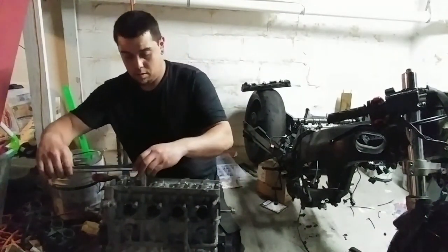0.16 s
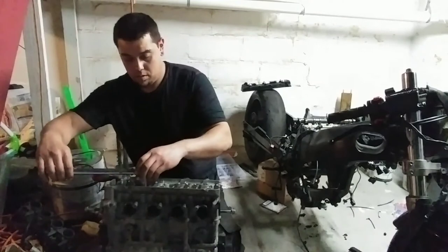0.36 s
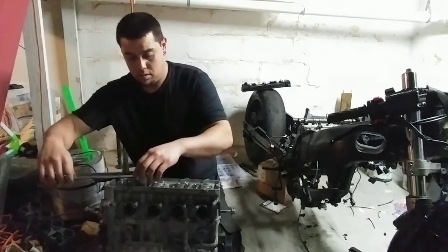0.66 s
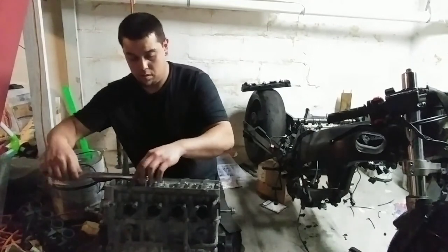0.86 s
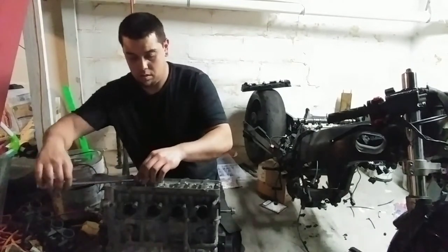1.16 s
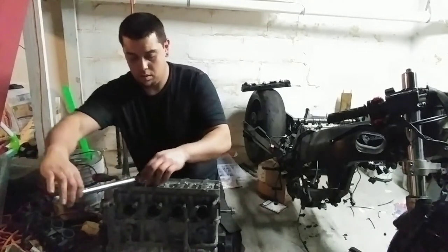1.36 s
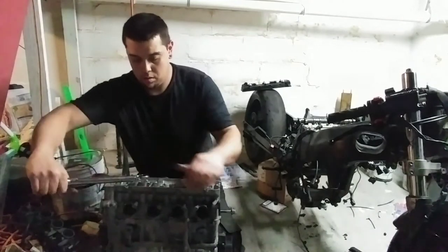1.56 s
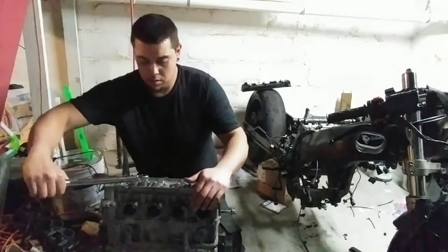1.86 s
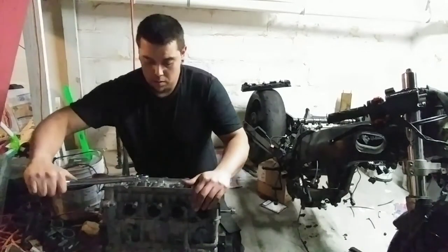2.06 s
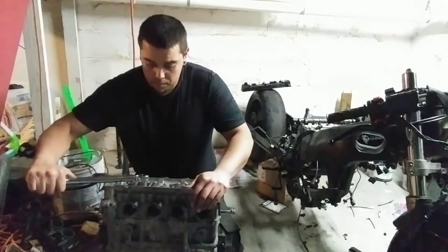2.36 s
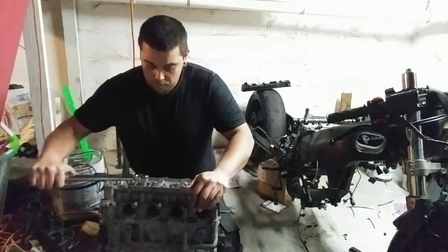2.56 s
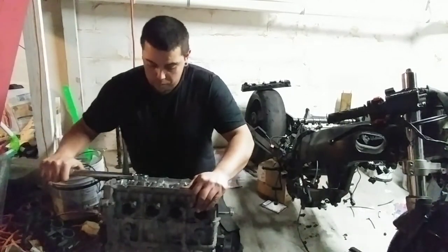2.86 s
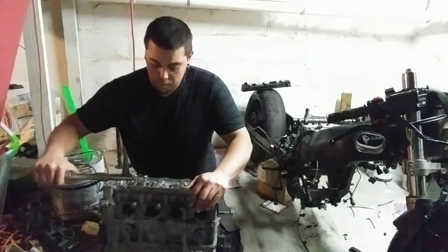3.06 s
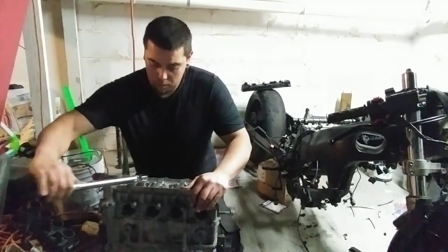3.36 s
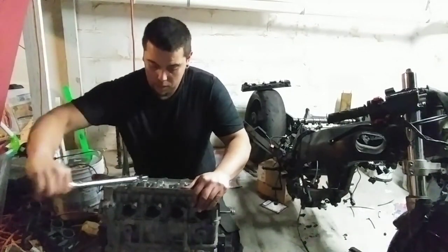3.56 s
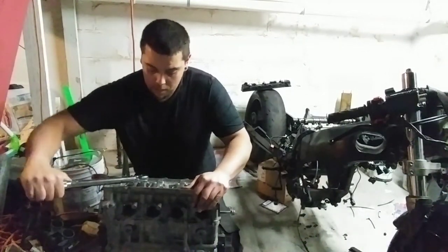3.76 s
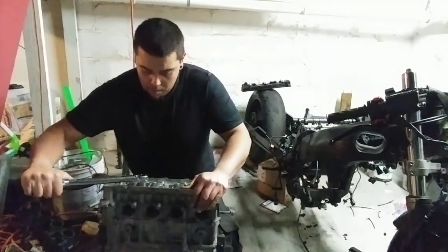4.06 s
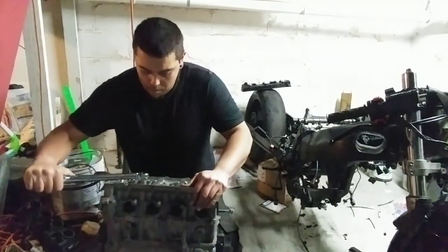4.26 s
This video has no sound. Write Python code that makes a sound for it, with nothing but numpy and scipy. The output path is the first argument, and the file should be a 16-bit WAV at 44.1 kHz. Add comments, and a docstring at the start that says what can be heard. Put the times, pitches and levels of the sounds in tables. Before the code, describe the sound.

Steady low hum, rumble and faint hiss fill a small garage while a wrench works on an engine bolt. Two small socket ticks lead into a single sharp steel click with a brief high ring, by far the loudest sound. A quick run of five ratchet ticks follows, then a faint tick and brief thin hiss. Later the ratchet ticks four times and the grip scuffs lightly. The microphone makes the clicks sound bright and crisp.

```python
"""A click-type torque wrench tightens an engine bolt in a small garage, over hum, rumble and hiss.
The socket ticks twice as it takes the load. At 0.8 s the toggle slips and hammers the steel tube:
one loud ringing click. On the back swing the pawl skips five ratchet teeth. A second pull at 1.6 s
brings a faint socket tick and a soft swell of hiss. From 3.3 s the pawl skips four more teeth,
then the handle scuffs in the grip. Throughout, the microphone adds a peak near 7 kHz."""
import sys
import numpy as np
from scipy import signal
from scipy.fft import rfft, irfft
from scipy.io import wavfile
from scipy.ndimage import uniform_filter1d

SR = 44100
rng = np.random.default_rng(int(sys.argv[2]) if len(sys.argv) > 2 else 0)


def to_wav(s):
    """Save 16-bit WAV."""
    ch = np.atleast_2d(s).T  # columns
    pcm = np.round(np.clip(ch, -1, 1) * 32767)  # PCM
    wavfile.write(sys.argv[1], SR, pcm.astype(np.int16))


N = 193599
BLOW_T_S = np.arange(SR // 2) / SR
SCENE_T_S = np.arange(N) / SR

# break-over crack: freq_hz, density_db
CRACK_SPECTRUM = [(400, -34), (850, -24), (1600, -17), (2100, -18), (2580, -8.5), (2950, -12.5),
                  (4100, -14), (4700, -7), (5500, -15), (7200, 0.5), (8100, -9), (8700, -12.5),
                  (10200, -19.5), (15500, -27)]
# ring of tube, socket and bolt, as heard: pitch_hz, level_db, t60_s
STEEL_MODES = [(2577, -18, .2), (2615, -16, .22), (2671, -18, .2), (3090, -16, .21), (4586, -15, .24),
               (4700, -14, .26), (4985, -13, .2), (6261, -13, .26), (6551, -11, .28), (6645, -3, .2),
               (6963, -2, .32), (7038, 0, .26), (7160, -3, .27), (7346, -1, .24), (7456, -3, .21),
               (7945, -7, .22), (8145, -6, .2), (8416, -13, .24), (8961, -14, .22), (9582, -20, .18),
               (12540, -20, .13)]
# pawl drops off a tooth: start_s, level_db, hardness_db, socket_ring_db
PAWL_DROPS = [(1.1792, -29.5, 1, -8.5), (1.2220, -28.5, -4, -3), (1.2642, -27, -0.5, -5.5),
              (1.3078, -28, -0.5, -22), (1.3580, -31, -2, -10), (3.3230, -29, -6, -22),
              (3.368, -28, -1, -17), (3.415, -27, 4, -17), (3.4719, -28, 5, -18)]
# pawl tick resonances as heard, including the microphone's 7 kHz peak: pitch_hz, width_hz, level_db
PAWL_TICK_PEAKS = [(1740, 170, -14), (2780, 560, -15), (4500, 640, -15), (5750, 420, -3.5), (6890, 340, 4),
                   (7460, 550, -0.5), (7900, 250, -7.5), (10000, 410, -9.5), (10830, 390, -8),
                   (12550, 560, -4.5), (14050, 600, -13), (15150, 560, -14)]
# socket shifts on the bolt: start_s, level_db, treble_db, decay_s
SOCKET_SHIFTS = [(0.3927, -49.5, 19, 0.0018), (0.5155, -31, -3, 0.0016), (1.6046, -47, 9, 0.0046)]
# socket tick: freq_hz, density_db
SOCKET_SPECTRUM = [(600, -29), (1800, -12.5), (3000, -13), (3800, -2.5), (4520, 1.5), (5250, 0), (6100, -6),
                   (7200, 0.5), (8150, -5), (8800, -16), (15500, -31)]
# handle scuffs in the grip: start_s, level_db, treble_db, decay_s
GRIP_SCUFFS = [(3.6532, -48.5, -21, 0.0054), (3.6861, -45, 5, 0.011), (3.7050, -46.5, 1, .006)]
# grip scuff: freq_hz, density_db
GRIP_SPECTRUM = [(600, -16), (1500, 2), (2800, 2), (3700, -1), (4500, 2), (5300, -7), (7200, 4),
                 (8800, -14), (15500, -18)]
# garage reverberation: freq_hz, t60_s
ROOM_DECAY = [(500, 0.28), (2100, 0.33), (5500, 0.31), (7200, 0.29), (10000, 0.21), (15000, 0.15)]
# swelling hiss: freq_hz, density_db
SWELL_SPECTRUM = [(2000, -12), (5500, -11), (7200, 0.5), (8800, -21), (15500, -30)]
# mains and distant motor: pitch_hz, rms_db
HUM_LINES = [(119.4, -42.5), (241.5, -47.5), (361, -51), (398, -55.5), (518, -55.5), (638, -51),
             (1039, -55)]
# room rumble: freq_hz, density_db
RUMBLE_SPECTRUM = [(20, -32), (33, -18), (45, -17), (57, 4), (76, -3), (98, 4), (135, -5.5), (250, -6.5),
                   (300, -9), (430, -10.5), (800, -16), (1060, -15), (1400, -23.5), (1700, -50)]
# room hiss: freq_hz, density_db
HISS_SPECTRUM = [(820, -75), (1400, -1.5), (1780, -3.5), (1930, -5.5), (1990, -4), (2460, -6), (3870, -11),
                 (4230, -11), (5280, -13), (7140, -5), (8820, -21), (12700, -23.5), (14700, -26),
                 (15500, -25)]


def break_over(ring_db=-8):
    """The toggle slips and hammers the tube twice; the steel rattles and rings on."""
    force = strike(decay_s=0.0025, chatter_db=27, rebound_s=0.0083, rebound_db=-13.5)
    crack = garage(force, tail_db=4, build_s=0.012, echo_db=1.5, echo_decay_s=0.0071)
    crack = colour(crack, lambda hz: lookup(CRACK_SPECTRUM, hz))
    ring = sum(gain(db - 60 * BLOW_T_S / t60_s) * np.sin(2 * np.pi * (hz * BLOW_T_S + rng.random()))
               for hz, db, t60_s in STEEL_MODES)
    return unit_energy(crack) + gain(ring_db) * unit_energy(ring)


def pawl(hardness_db, socket_ring_db, socket_hz=3390, spring_hz=9480, ring_width_hz=300):
    """The pawl snaps off a tooth and rebounds once; a harder snap is brighter and knocks more."""
    # each tooth seats differently
    peaks = [(hz * (1 + rng.normal(0, 0.008)), width_hz, db + rng.normal(0, 1))
             for hz, width_hz, db in PAWL_TICK_PEAKS]
    spring_db = -3.5 + 1.15 * hardness_db
    peaks += [(socket_hz, ring_width_hz, socket_ring_db), (spring_hz, ring_width_hz, spring_db)]
    knock_db = 1 + 0.95 * hardness_db
    tilt = [(3500, knock_db), (6000, 0), (10000, 0), (14000, hardness_db)]

    def tick_db(hz):
        power = sum(gain(db) ** 2 / (1 + ((hz - pitch_hz) / width_hz) ** 2) ** 2
                    for pitch_hz, width_hz, db in peaks)
        return 10 * np.log10(power) + lookup(tilt, hz)

    force = strike(decay_s=0.0014, chatter_db=8.5, rebound_s=0.0019, rebound_db=-3)
    snap = garage(force, tail_db=-1.5, build_s=0.0032, echo_db=-6.5, echo_decay_s=0.0045)
    return colour(snap, tick_db)


def slip(spectrum, treble_db, decay_s):
    """Two surfaces slip and catch again: a small tick."""
    force = contact(decay_s, chatter_db=13)
    tick = garage(force, tail_db=-1.5, build_s=0.0041, echo_db=-4, echo_decay_s=0.0065)
    tilt = [(5000, 0), (11000, treble_db)]
    return colour(tick, lambda hz: lookup(spectrum, hz) + lookup(tilt, hz))


def strike(decay_s, chatter_db, rebound_s, rebound_db):
    """A contact and one rebound."""
    rebound = np.pad(contact(decay_s, chatter_db), (round(rebound_s * SR), 0))[:len(BLOW_T_S)]
    return unit_energy(contact(decay_s, chatter_db)) + gain(rebound_db) * unit_energy(rebound)


def contact(decay_s, chatter_db):
    """Contact force: one impulse, then dying chatter."""
    chatter = rng.standard_normal(len(BLOW_T_S)) * np.exp(-BLOW_T_S / decay_s)
    force = gain(chatter_db) * unit_energy(chatter)
    force[0] += 1
    return force


def garage(force, tail_db, build_s, echo_db, echo_decay_s, echoes_per_s=1500):
    """Direct sound, quick echoes off the engine block, tail from the walls."""
    n = len(BLOW_T_S)
    hz, frame_s, bands = signal.stft(rng.standard_normal(n), SR, nperseg=256)
    bands *= gain(-60 * frame_s / lookup(ROOM_DECAY, hz)[:, None])
    tail = signal.istft(bands, SR, nperseg=256)[1][:n]
    tail *= 1 - np.exp(-BLOW_T_S / build_s)
    echoes = rng.standard_normal(n) * (rng.random(n) < echoes_per_s / SR)
    echoes *= BLOW_T_S * np.exp(-BLOW_T_S / echo_decay_s)
    response = gain(tail_db) * unit_energy(tail) + gain(echo_db) * unit_energy(echoes)
    response[0] += 1
    return signal.fftconvolve(force, response)[:n]


def hiss_swell(start_s=1.57, end_s=2.25, fade_s=0.08, rms_db=-50):
    """Thin hiss fades in, holds, fades out."""
    envelope = np.clip(np.minimum(SCENE_T_S - start_s, end_s - SCENE_T_S) / fade_s, 0, 1)
    return gain(rms_db) * envelope * noise(SWELL_SPECTRUM)


def hum(waver_rad=0.97, waver_hz=10.5):
    """Mains and a distant motor: steady tones, each wavering in phase."""
    tones = np.zeros(N)
    for hz, rms_db in HUM_LINES:
        phase_rad = 2 * np.pi * (hz * SCENE_T_S + rng.random()) + waver_rad * drift(waver_hz)
        tones += gain(rms_db) * np.sqrt(2) * np.sin(phase_rad)
    return tones


def room_air(rumble_db=-34.08, hiss_db=-47):
    """Steady low rumble and faint hiss."""
    return gain(rumble_db) * noise(RUMBLE_SPECTRUM) + gain(hiss_db) * noise(HISS_SPECTRUM)


def noise(spectrum):
    """Shaped noise, rms 1."""
    hz = np.fft.rfftfreq(N, 1 / SR)
    return unit_rms(irfft(rfft(rng.standard_normal(N)) * gain(lookup(spectrum, hz)), N))


def drift(rate_hz):
    """Slow random motion, rms 1."""
    hz = np.fft.rfftfreq(N, 1 / SR)
    return unit_rms(irfft(rfft(rng.standard_normal(N)) / (1 + (hz / rate_hz) ** 4), N))


def colour(blow, target_db):
    """Gives a blow the broad spectrum target_db(hz); minimum phase, so no pre-ring."""
    hz = abs(np.fft.fftfreq(4096, 1 / SR))
    power = uniform_filter1d(abs(rfft(blow)) ** 2, size=300)
    power = np.interp(hz, np.fft.rfftfreq(len(blow), 1 / SR), power / power.mean())
    magnitude = gain(target_db(hz)) / np.sqrt(power)
    log_response = np.conj(signal.hilbert(np.log(magnitude + 1e-5)))
    response = np.fft.ifft(np.exp(log_response)).real
    return signal.fftconvolve(blow, response[:2048])[:len(blow)]


def lookup(curve, hz):
    """Interpolates on a log-frequency axis."""
    freq_hz, values = np.transpose(curve)
    return np.interp(np.log(hz + 1), np.log(freq_hz + 1), values)


def gain(db):
    return 10 ** (np.asarray(db) / 20)


def unit_rms(x):
    return x / np.sqrt(np.mean(x ** 2) + 1e-20)


def unit_energy(x):
    return x / (np.linalg.norm(x) + 1e-20)


def add(mix, blow, start_s, level_db):
    """Mixes in a blow; level_db is its rms over the first 40 ms."""
    span = mix[round(start_s * SR):][:len(blow)]
    span += gain(level_db) * blow[:len(span)] / np.std(blow[:SR // 25])


def scene():
    """Wrench over the garage background, mono."""
    mix = hum() + room_air() + hiss_swell()
    add(mix, break_over(), start_s=0.8213, level_db=-11)
    for start_s, level_db, hardness_db, socket_ring_db in PAWL_DROPS:
        add(mix, pawl(hardness_db, socket_ring_db), start_s, level_db)
    for slips, spectrum in (SOCKET_SHIFTS, SOCKET_SPECTRUM), (GRIP_SCUFFS, GRIP_SPECTRUM):
        for start_s, level_db, treble_db, decay_s in slips:
            add(mix, slip(spectrum, treble_db, decay_s), start_s, level_db)
    return mix[None]


def record(dry, cutoff_hz=15650):
    """Soft clip near full scale, then low-pass."""
    clipped = dry / (1 + dry ** 6) ** (1 / 6)
    lowpass = signal.firwin(511, cutoff_hz, window=("kaiser", 9), fs=SR)
    return signal.oaconvolve(clipped, lowpass[None], "same")


dry = scene()
out = record(dry)
to_wav(out)
```